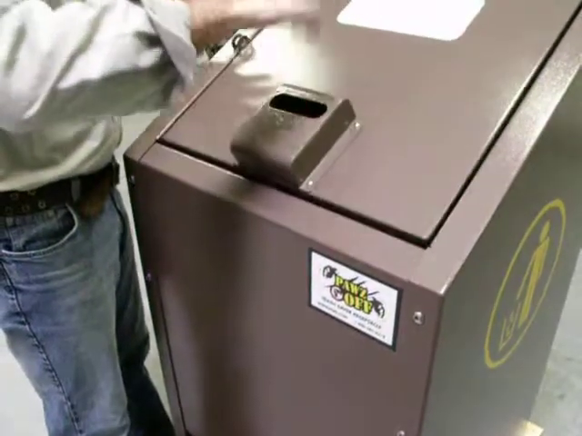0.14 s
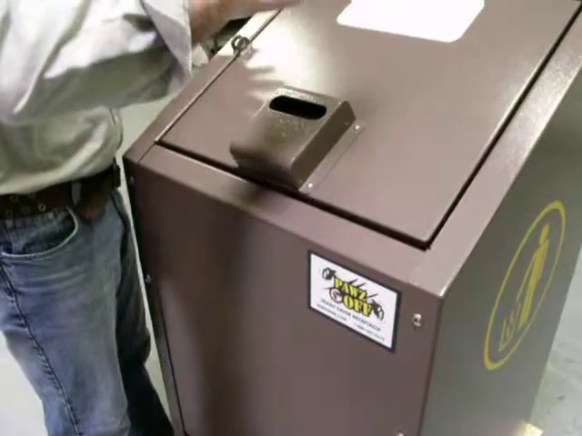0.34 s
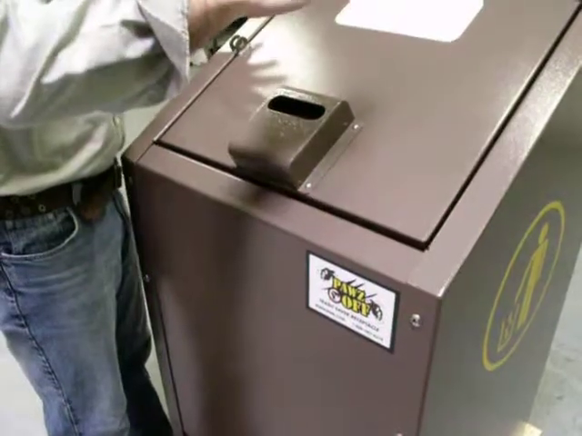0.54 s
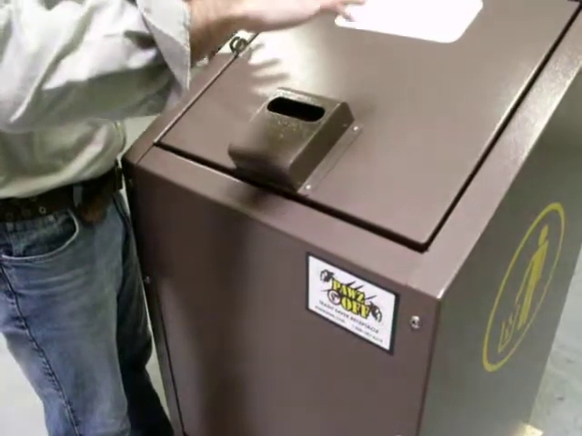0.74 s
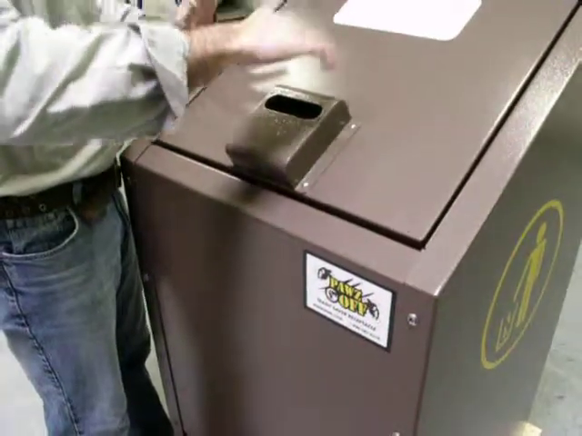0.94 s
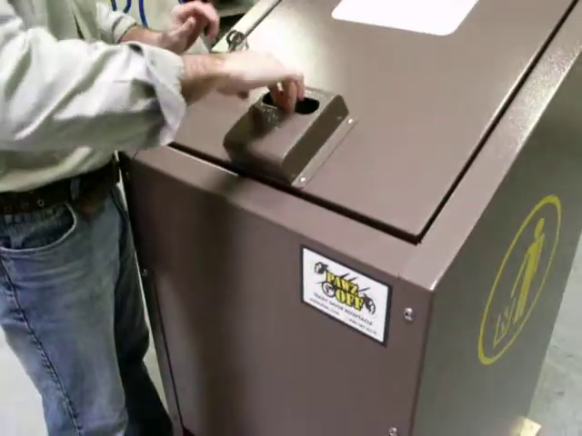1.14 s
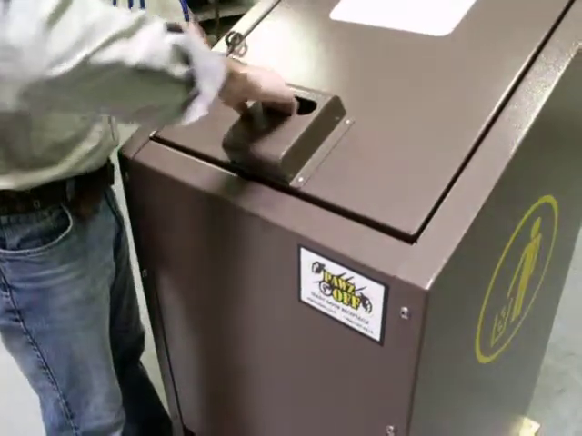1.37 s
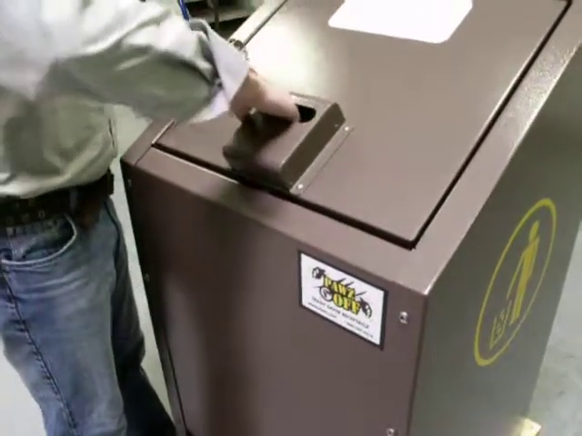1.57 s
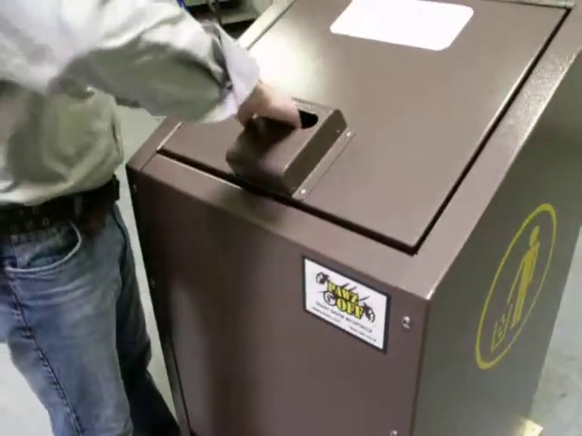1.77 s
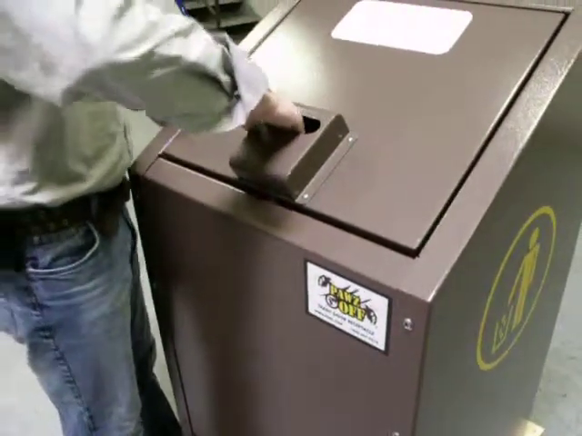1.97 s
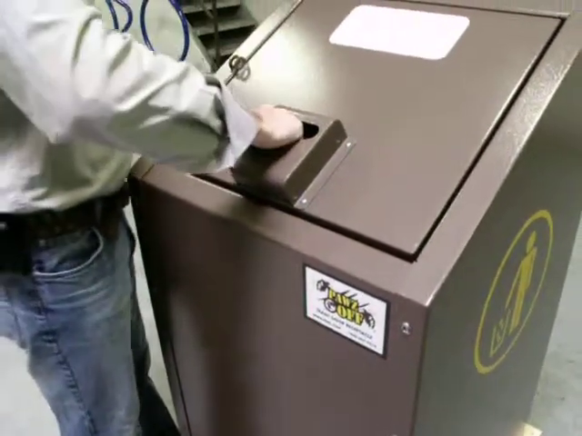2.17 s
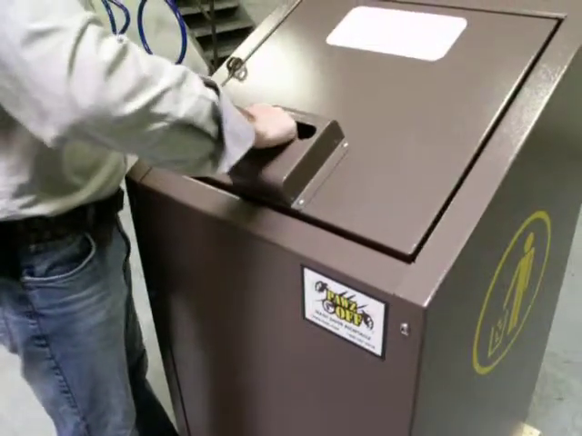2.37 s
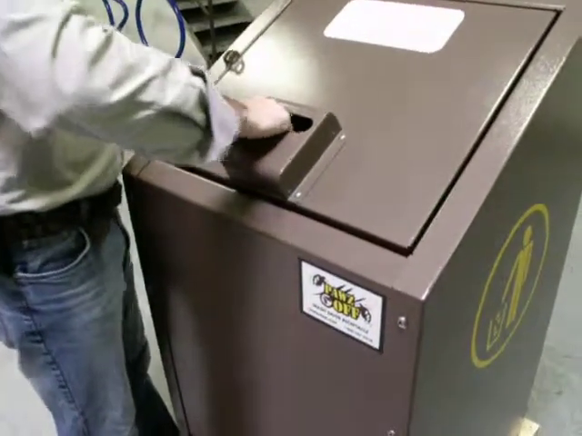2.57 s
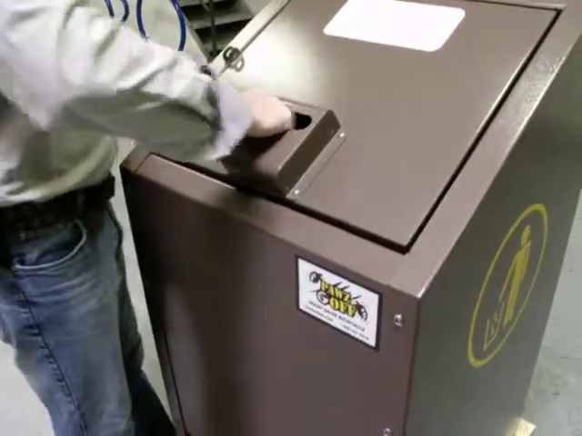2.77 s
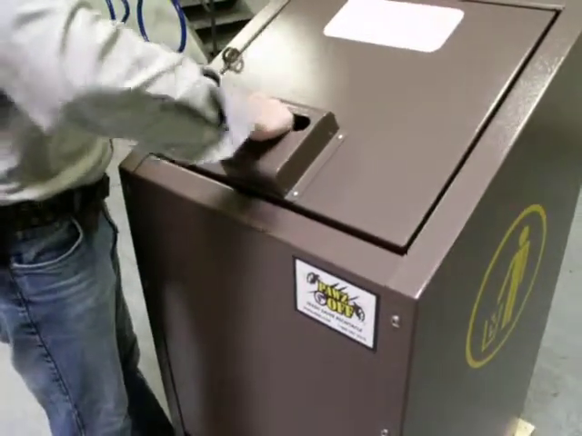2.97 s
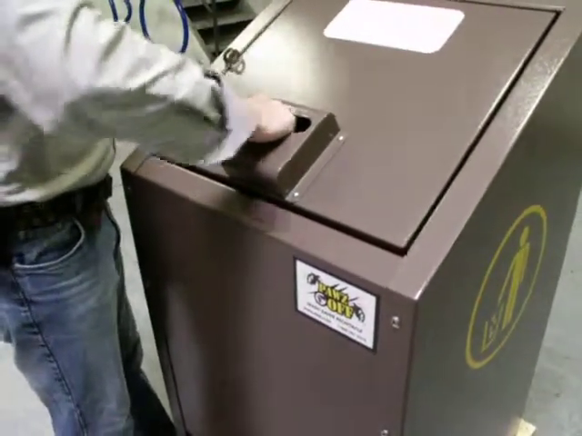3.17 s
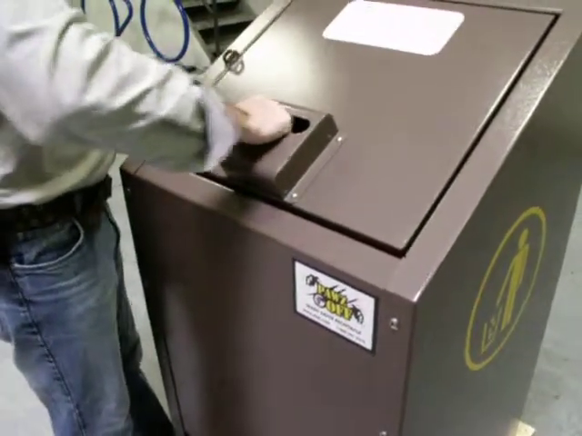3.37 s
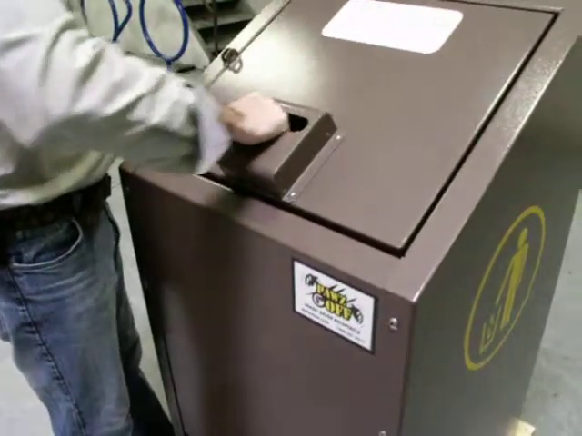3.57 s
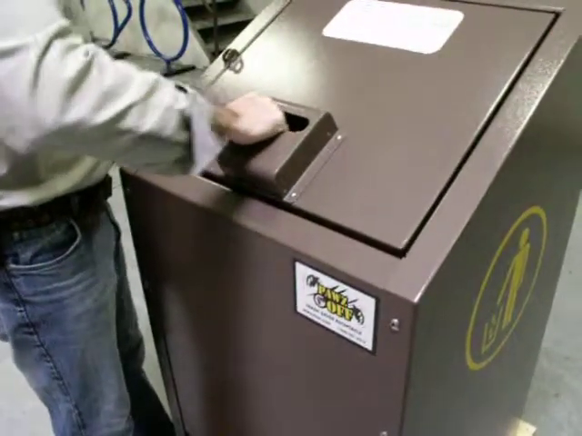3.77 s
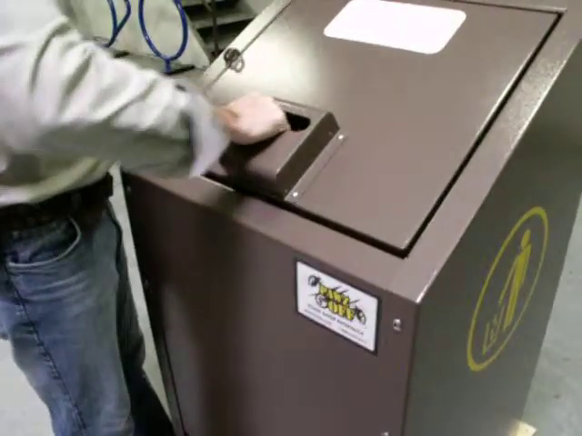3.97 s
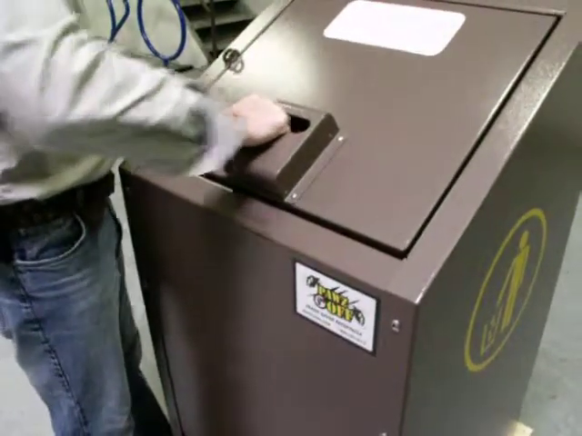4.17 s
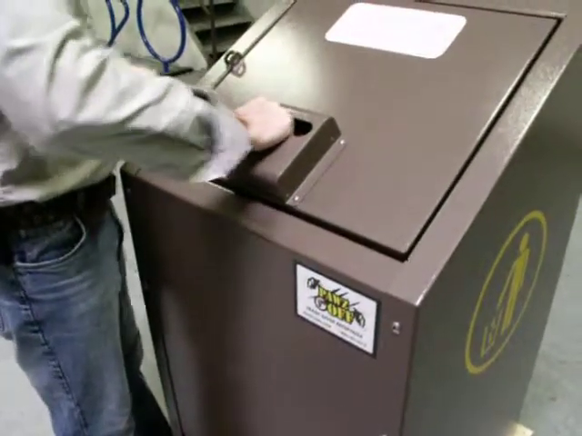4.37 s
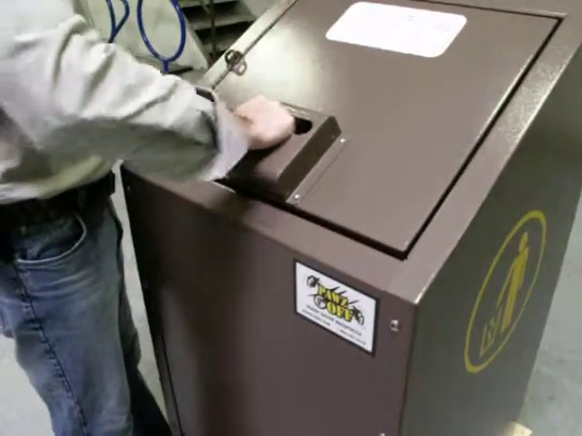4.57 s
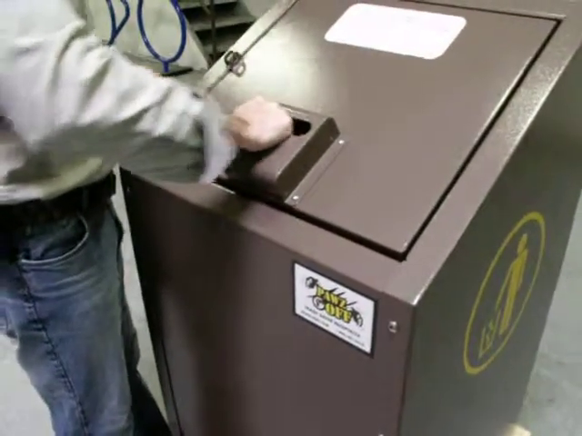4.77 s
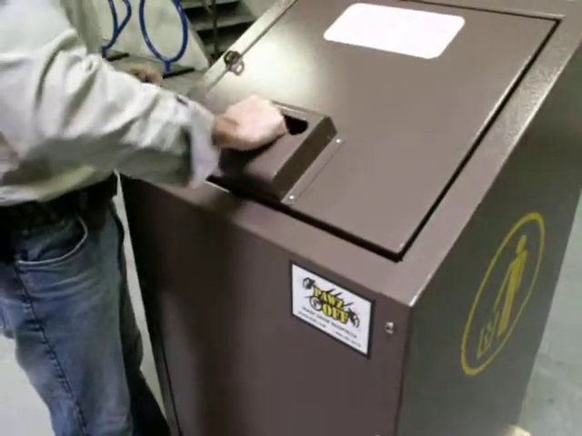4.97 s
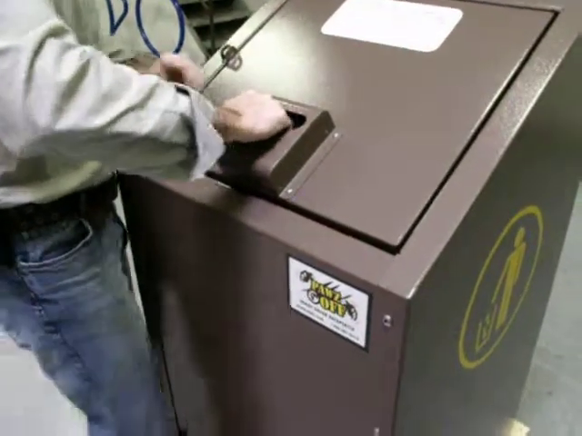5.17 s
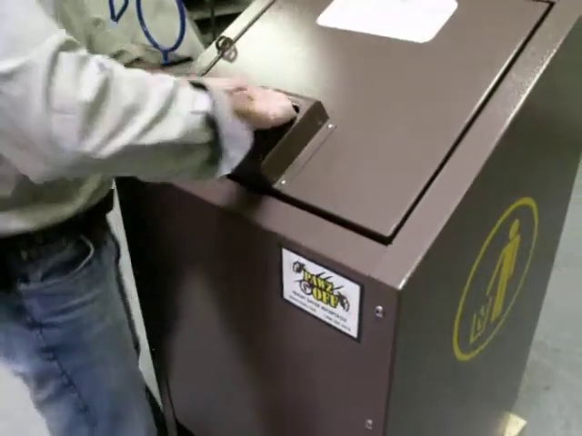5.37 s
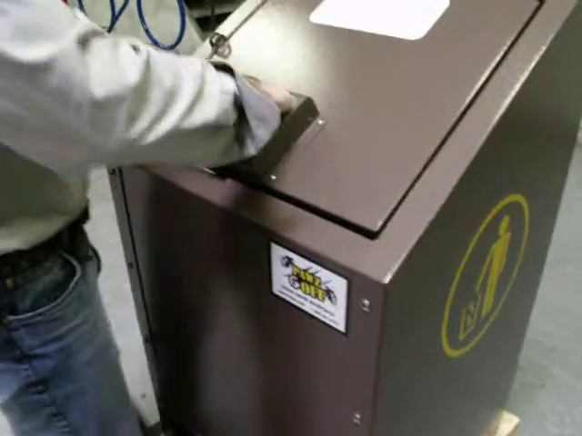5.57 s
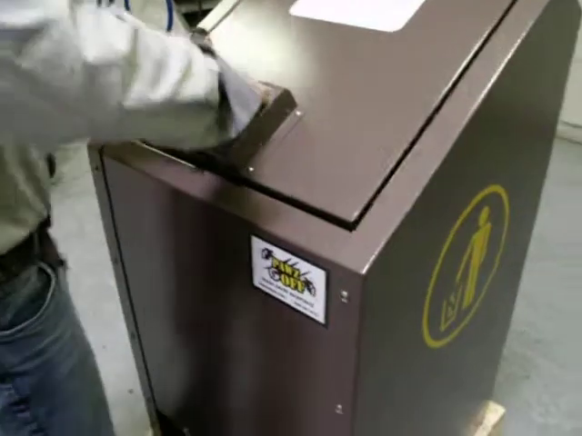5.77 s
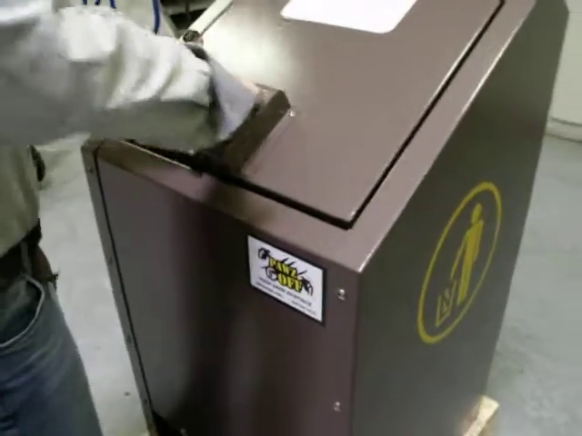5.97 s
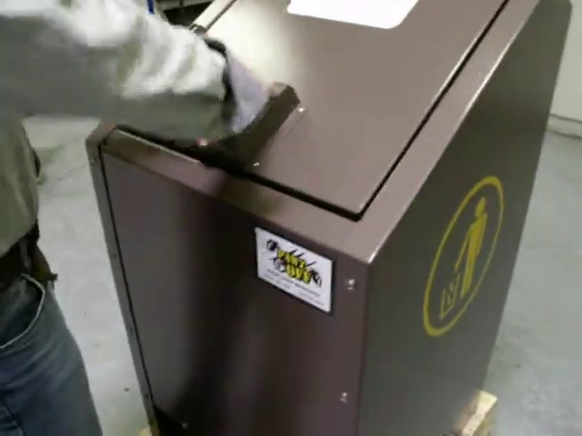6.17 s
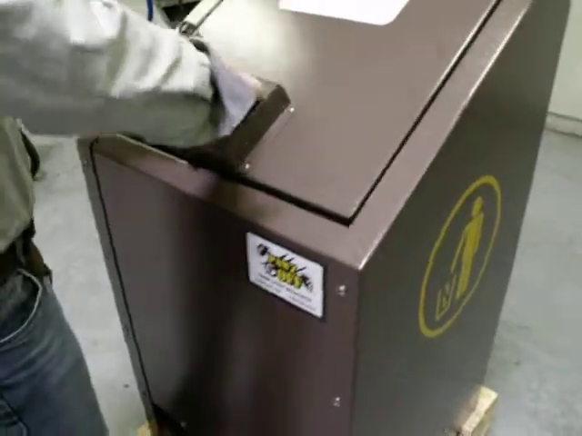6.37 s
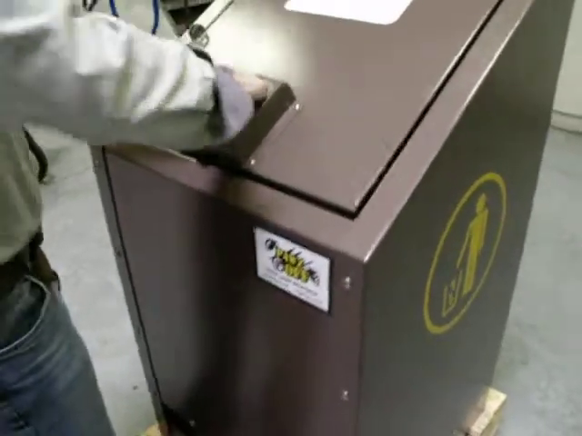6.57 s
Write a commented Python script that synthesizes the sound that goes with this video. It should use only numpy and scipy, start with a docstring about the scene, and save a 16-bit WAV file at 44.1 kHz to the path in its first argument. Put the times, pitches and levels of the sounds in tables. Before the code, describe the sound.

A heavy steel bin lid clanks shut, then is knocked, jerked rhythmically against its latch and banged hard in a large humming warehouse.

```python
"""A heavy steel bin lid drops shut, is knocked lightly, then tugged by its handle against the latch about four
times a second, and is finally banged up and down. Each blow is a burst of contacts that excites decaying sines,
a noise crowd of plate modes and a stiff latch. A large warehouse adds diffuse reverberation; its ventilation
is a wavering hum over filtered noise. A small, narrow-band microphone close by overloads on hard blows."""
import sys
import numpy as np
from scipy import signal
from scipy.fft import rfft, irfft, next_fast_len
from scipy.io import wavfile

SR = 44100
rng = np.random.default_rng(int(sys.argv[2]) if len(sys.argv) > 2 else 0)


def master(y):
    """Save y as 16-bit WAV."""
    cut = np.clip(np.atleast_2d(y).T, -1, 1)
    pcm = np.round(cut * 32767)  # scale
    wavfile.write(sys.argv[1], SR, pcm.astype(np.int16))


N = 292824


def lid():
    """All blows of the lid, summed at their start times."""
    out = np.zeros(N)
    for gesture in (drop, knocks, tugs, rattles, bangs):
        for start_s, sound in gesture():
            add(out, start_s, sound)
    return out


def drop():
    """The lid falls on nearly the whole rim and bounces; every bounce is weaker and brighter."""
    # landings of the dropped lid: start_s
    landing_times = [0.133, 0.152, 0.192, 0.243, 0.288]
    first_force_db, loss_per_bounce_db = 4, 2.5
    first_bright_db_per_oct, gain_per_bounce_db_per_oct = 0.87, 0.5
    for k, start_s in enumerate(landing_times):
        force_db = first_force_db - k * loss_per_bounce_db
        bright_db = first_bright_db_per_oct + k * gain_per_bounce_db_per_oct
        yield start_s, blow(force_db, latch_db=-13, bright_db=bright_db, flat=0.9, chatter_s=.013,
                            sustain=0.58, modes_db=-2.5, crack_db=-1)


def knocks():
    """Light knocks: hand bumps at first, short and hollow; later the lid settling after the last pull, ringing longer."""
    # light knocks: start_s, force_db, bright_db_per_oct (before limiting), sustain (t60 factor)
    knock_table = [(1.723, -13.5, -0.2, 0.27), (1.796, -24, 0, .35), (2.032, -10, -4, 0.43),
                   (2.295, -11, -0.4, 0.71), (5.086, -11, .5, 0.8), (5.203, -13, -1, 1),
                   (5.305, -20.5, 1, 1), (5.432, -18, -1, 1), (5.709, -14.5, 0.4, 0.96)]
    for start_s, force_db, bright_db, sustain in knock_table:
        yield start_s, blow(force_db, latch_db=-15, bright_db=bright_db, flat=0.48, chatter_s=0.0046,
                            sustain=sustain, plate_db=-3.5, crack_db=1.5, crack_s=0.0062)


def tugs():
    """Pulls jerk the lid up against the latch; over the run of pulls the lid rings longer and brighter."""
    # pulls on the handle: start_s, force_db
    tug_table = [(2.458, -4.5), (2.720, -3), (2.967, -4.5), (3.185, -4.5), (3.429, -6), (3.652, -3),
                 (3.887, -3.5), (4.125, -2), (4.344, -3), (4.578, -3), (4.813, -3.5)]
    first_sustain, sustain_per_s = 0.65, .13
    first_bright_db_per_oct, bright_gain_per_s = -0.44, 0.66
    # the first pull barely reaches the latch; later ones ring it fully
    full_latch_db, first_shortfall_db, take_up_s = 0, 14.5, 0.15
    first_s = tug_table[0][0]
    for start_s, force_db in tug_table:
        since_s = start_s - first_s
        latch_db = full_latch_db - first_shortfall_db * np.exp(-since_s / take_up_s)
        bright_db = first_bright_db_per_oct + bright_gain_per_s * since_s
        sustain = first_sustain + sustain_per_s * since_s
        yield start_s, blow(force_db, latch_db=latch_db, bright_db=bright_db, flat=.15, chatter_s=0.0066,
                            sustain=sustain, modes_db=-2.5, plate_db=-3.5, crack_db=-1.5, crack_s=0.0052)


def rattles():
    """Around the pulls the lid sinks back and the latch rattles in its play: loose, bright chatter."""
    # rattles: start_s, force_db
    rattle_table = [(2.335, -21.5), (2.532, -15), (2.585, -14), (2.81, -17.5), (2.908, -23.5), (3.051, -25),
                    (3.296, -8), (3.776, -12), (4.009, -9), (4.225, -20), (4.430, -9.5), (4.896, -9.5),
                    (5.055, -11), (5.175, -13)]
    for start_s, force_db in rattle_table:
        yield start_s, blow(force_db, latch_db=3.0, bright_db=1.75, flat=0.093, chatter_s=.015,
                            sustain=0.96, plate_db=-3.5, crack_db=-3)


def bangs():
    """The freed lid is banged hard, with a strike between latch and rim."""
    # bangs: start_s, force_db, chatter_s, sustain (t60 factor, short if hand-damped)
    bang_table = [(5.884, 0, .0055, 0.76), (5.985, -6.5, .015, .57), (6.138, -2, .0047, .96),
                  (6.244, -9, .015, 0.94), (6.310, 0.5, .012, 0.48), (6.398, -1.5, .0086, 0.74),
                  (6.445, -9, 0.014, 1), (6.492, 1.5, .0083, 1), (6.542, -6, .018, 0.47),
                  (6.595, -3.5, 0.011, .78)]
    for start_s, force_db, chatter_s, sustain in bang_table:
        yield start_s, blow(force_db, latch_db=-3.5, bright_db=0.8, flat=0.37, chatter_s=chatter_s,
                            sustain=sustain, modes_db=-3.5, crack_db=-0.5)


def blow(force_db, latch_db, bright_db, flat, chatter_s, sustain,
         plate_db=-3, modes_db=-3, rim_db=-2.5, spread_s=0.0037,
         crack_db=0, crack_s=0.0026, detune=0.0028, uneven_db=2):
    """One steel-on-steel blow, at the latch (flat=0) to whole rim (flat=1): crack, panels and latch."""
    # lid and box modes: pitch_hz, t60_s (at sustain 1), latch_hit_db, rim_hit_db (both relative)
    mode_table = [ (73.5, .7, -22, -19), (190, 1.1, -20.5, -7), (234.6, .7, -17.5, -18.5),
                  (338, 0.96, -20, -12.5), (425.7, 1.14, -19, -24.5), (474.3, 0.43, -15.5, -7),
                  (520, 0.49, -10.5, -12.5), (560.6, 0.49, -11.5, -7.5), (583, 0.56, -13.5, -1.5),
                  (632, 0.77, -16, -14.5), (663.4, 0.61, -16, 2), (732, 0.38, -10.5, -10),
                  (840, 0.46, -14, -9), (995, 1.08, -18, -15.5), (1085, 0.77, -24.5, -13.5),
                  (1135, 0.32, -17.5, -20), (1240, 1.1, -19, -12), (1398, 0.44, -22, -17.5),
                  (1547, 0.36, -14, -16.5), (1566, 0.4, -18.5, -14.5), (1645, 1.02, -18.5, -12),
                  (1747, 0.74, -17.5, -22.5), (1895, 0.24, -30.5, -12.5), (1988, 0.48, -13, -15),
                  (2187, 0.52, -14.5, -18), (2280, 0.42, -16.5, -14), (2580, 0.3, -15, -13),
                  (2715, 0.51, -20.5, -22), (2867, 0.32, -19, -11.5), (3470, 0.27, -23, -23.5),
                  (4270, 0.26, -17.5, -19)]
    # crowd of closely spaced plate modes: freq_hz, density_db (relative, per Hz)
    plate_spectrum = [(30, -12), (75, -11), (115, -0.5), (200, -1), (300, -5.5), (600, 7), (930, 1),
                      (1600, -0.5), (2400, -1.5), (3300, -5), (4100, -9), (5200, -5)]
    # decay of that crowd: freq_hz, t60_s (at sustain 1)
    plate_decay = [(80, 1), (500, 0.52), (1500, 0.92), (3000, 0.63), (5000, 0.4)]
    # small stiff latch: pitch_hz, t60_s, level_db (relative)
    latch_modes = [(4480, .025, -18), (4666, 0.02, -6.5), (4756, 0.029, -8), (5400, 0.053, -19.5),
                   (4870, 0.013, -8), (5233, 0.024, -4)]
    # crack of the contact: freq_hz, density_db (relative, per Hz)
    crack_spectrum = [(60, -15.5), (200, -3.5), (350, -12), (620, 10), (950, 0.5), (1800, 3), (3600, -7.5),
                      (5000, -6), (8000, -9.5)]

    t = np.arange(int(.7 * SR)) / SR
    flat, sustain = np.clip(flat, 0, 1), max(sustain, .05)
    touches = contacts(chatter_s)
    energy = np.pad(touches ** 2, (0, len(t) - len(touches)))

    # mode pitches and levels vary a little at random from blow to blow
    hz, t60, at_latch_db, at_rim_db = np.transpose(mode_table)
    hz = hz * (1 + detune * rng.standard_normal(len(hz)))
    mode_db = (1 - flat) * at_latch_db + flat * (at_rim_db + rim_db) + modes_db
    mode_db = mode_db + uneven_db * rng.standard_normal(len(hz))
    modes = ring(hz, t60 * sustain, mode_db, t)

    crowd = unit(colour(rng.standard_normal(len(t)), lambda f: read(plate_spectrum, f)))
    crowd = amp(plate_db) * die_away(crowd, np.array(plate_decay) * [1, sustain])
    # each knock adds energy, which bending waves need a few milliseconds to spread over the panels
    panels = (modes + crowd) * np.sqrt(np.cumsum(energy)) * (1 - np.exp(-t / spread_s))

    energy_decay = np.exp(-2 / (crack_s * SR))
    near_contact = np.sqrt(signal.lfilter([1], [1, -energy_decay], energy + 1e-18))
    crack_noise = unit(colour(rng.standard_normal(len(t)), lambda f: read(crack_spectrum, f)))
    crack = amp(crack_db) * near_contact * crack_noise

    # a harder, shorter contact favours the treble: tilt in dB per octave about 1 kHz
    tilt_db = np.clip(bright_db, -1, 2.5)
    body = colour(panels + crack, lambda f: tilt_db * np.log2(np.clip(f, 300, 6000) / 1000))
    latch_ring = ring(*np.transpose(latch_modes), t)
    latch = amp(latch_db) * signal.fftconvolve(latch_ring, touches)[:len(t)]
    return amp(force_db) * (body + latch)


def contacts(chatter_s, touch=0.85, count=9):
    """A first touch, then a run of knocks that swells until chatter_s and fades as the lid seats; unit energy."""
    when = np.append(0, 3 * (np.arange(count) + rng.random(count)) / count)  # in units of chatter_s
    swell = when * np.exp(1 - when)
    size = swell * rng.choice([-1, 1], count + 1) * rng.uniform(0.33, 1, count + 1) ** 2
    size[0] = touch
    at = (when * max(chatter_s, .002) * SR).astype(int)
    return np.bincount(at, size) / np.linalg.norm(size)


def ring(hz, t60, db, t):
    """A sum of exponentially dying sines, each starting up or down."""
    sign = rng.choice([-1, 1], len(hz))
    t, hz, t60 = (np.float32(v) for v in (t, hz, t60))
    fade = np.exp(-np.float32(np.log(1000)) * t / t60[:, None])
    return (sign * amp(db)) @ (np.sin(2 * np.pi * hz[:, None] * t) * fade)


def die_away(x, t60s):
    """Lets every frequency of x decay at its own speed."""
    hz, t, z = signal.stft(x, SR, nperseg=512)
    fade = np.exp(-np.log(1000) * t / read(t60s, hz)[:, None])
    return signal.istft(z * fade, SR)[1][:len(x)]


def warehouse(x, build_s=0.0076):
    """Diffuse reverberation: in every band, energy gathers in the hall and drains away, with random phase."""
    # decay of the hall: freq_hz, t60_s
    hall_decay = [(100, 1), (600, 1), (2000, 1), (3500, 0.7), (5500, 0.8)]
    # gain of the reflected sound: freq_hz, gain_db
    hall_gain = [(70, -2.5), (190, -3.5), (300, 3.5), (600, -3.5), (2000, -5.5), (3600, -4.5), (4800, -6)]
    size, hop = 1024, 256  # samples
    hz, _, direct = signal.stft(x, SR, nperseg=size, noverlap=size - hop)
    diffuse = signal.stft(rng.standard_normal(N), SR, nperseg=size, noverlap=size - hop)[2]
    # the first reflections arrive two frames late, then thicken
    build = np.exp(-hop / SR / build_s)
    fed = signal.lfilter([0, 0, 1 - build], [1, -build], abs(direct) ** 2)
    keep = np.exp(-2 * np.log(1000) * hop / SR / read(hall_decay, hz))
    stored = np.array([signal.lfilter([1 - k], [1, -k], band) for k, band in zip(keep, fed)])
    field = diffuse / diffuse.std() * np.sqrt(stored) * amp(read(hall_gain, hz))[:, None]
    return signal.istft(field, SR, nperseg=size, noverlap=size - hop)[1][:N]


def ventilation(waver=0.04, hum_db=0):
    """A fan hums, wavering slightly in level and phase, over a steady rush of air (filtered noise)."""
    # fan tone: pitch_hz, level_db (rms)
    fan_tones = [(156.1, -31.5)]
    # rushing air: freq_hz, density_db (relative, per Hz)
    air_spectrum = [(15, -37), (35, -16), (55, -11), (66, 0), (78, 0), (92, -7.5), (115, -8.5), (170, -5),
                    (230, 0), (290, -7), (470, -2), (680, -3.5), (900, -7), (1400, -11), (2800, -22),
                    (5500, -31)]
    air_rms_db = -27.5
    t = np.arange(N) / SR
    knots_s = np.linspace(0, t[-1], num=40)
    out = amp(air_rms_db) * unit(colour(rng.standard_normal(N), lambda f: read(air_spectrum, f)))
    for hz, db in fan_tones:
        swell = np.interp(t, knots_s, waver * rng.standard_normal(len(knots_s)))
        drift_rad = np.interp(t, knots_s, waver * rng.standard_normal(len(knots_s)))
        tone = np.sin(2 * np.pi * (hz * t + rng.random()) + drift_rad)
        out += np.sqrt(2) * amp(db + hum_db) * (1 + swell) * tone
    return out


def amp(db):
    """Decibels to gain."""
    return 10 ** (np.asarray(db) / 20)


def unit(x):
    """Scales to an rms of one."""
    return x / np.sqrt(np.mean(x ** 2) + 1e-20)


def read(points, hz):
    """Reads a table along a log-frequency axis."""
    f, value = np.transpose(points)
    return np.interp(np.log(hz + 1), np.log(f), value)


def add(mix, start_s, sound):
    """Mixes a sound in at start_s, cut at the end of the mix."""
    part = mix[round(start_s * SR):][:len(sound)]
    part += sound[:len(part)]


def colour(x, db_at):
    """Filters x by a gain in dB given as a function of frequency."""
    size = next_fast_len(len(x) + 4096)
    gain = amp(db_at(np.fft.rfftfreq(size, 1 / SR)))
    return irfft(rfft(x, size) * gain, size)[:len(x)]


def scene():
    """The bin, its reverberation and the ventilation."""
    steel = lid()
    return (steel + warehouse(steel) + ventilation())[None]


def record(dry, order=16):
    """The narrow-band microphone signal is clipped with a tight knee, then band-limited."""
    # microphone response: freq_hz, gain_db
    mic_response = [(10, -14), (30, 2.5), (4900, -1), (5300, -8.5), (5700, -13), (6050, -29), (6400, -53.5),
                    (7000, -101.5)]
    ceiling, edge_hz = .73, 15900
    heard = colour(dry[0], lambda f: read(mic_response, f))
    clipped = heard / (1 + abs(heard / ceiling) ** order) ** (1 / order)
    lowpass = signal.firwin(511, edge_hz, window=("kaiser", 9), fs=SR)
    return signal.oaconvolve(clipped, lowpass, "same")[None]


dry = scene()
out = record(dry)
master(out)
```